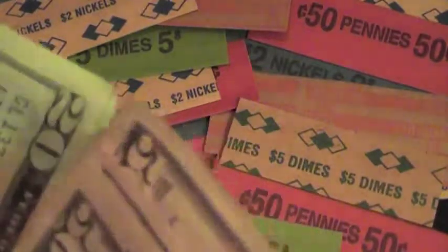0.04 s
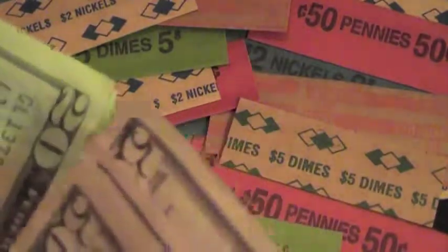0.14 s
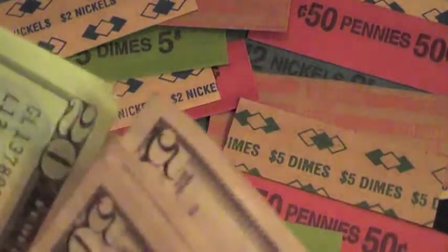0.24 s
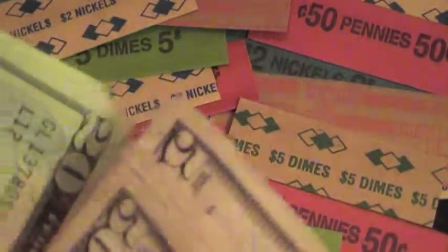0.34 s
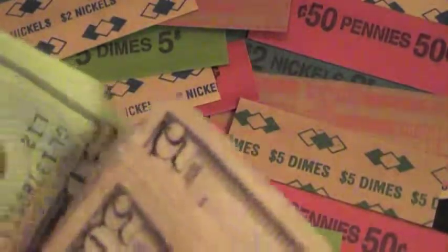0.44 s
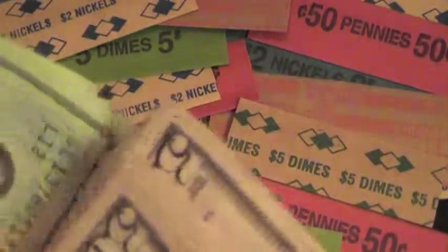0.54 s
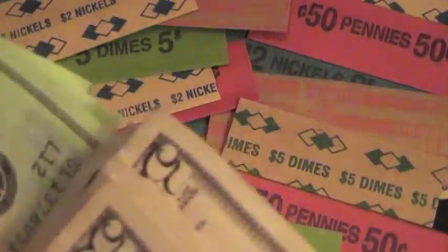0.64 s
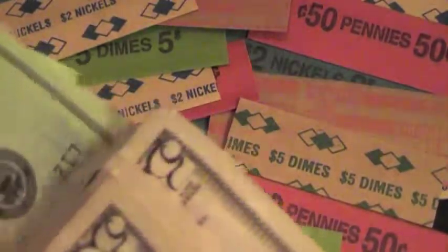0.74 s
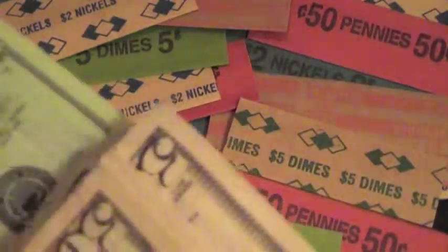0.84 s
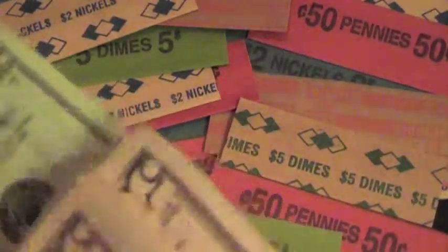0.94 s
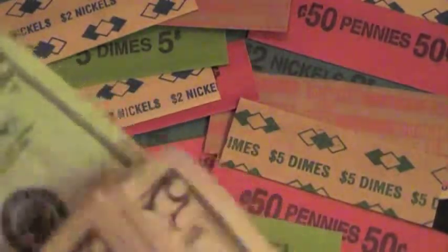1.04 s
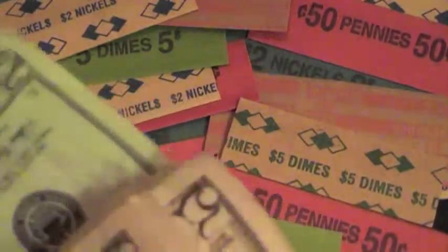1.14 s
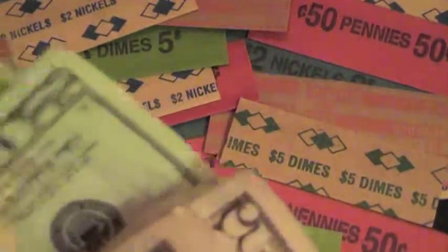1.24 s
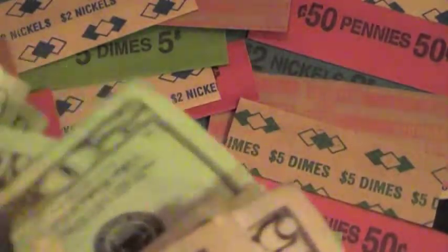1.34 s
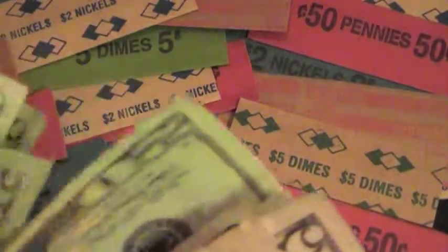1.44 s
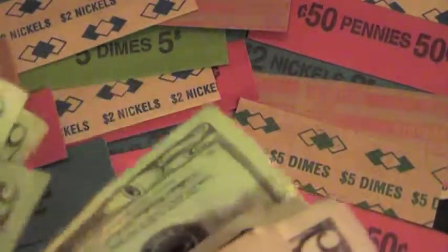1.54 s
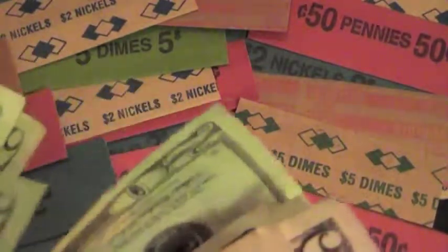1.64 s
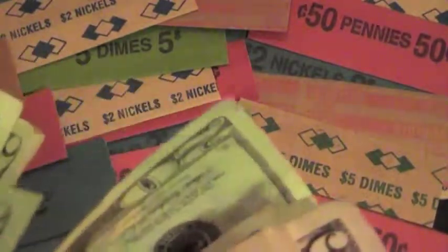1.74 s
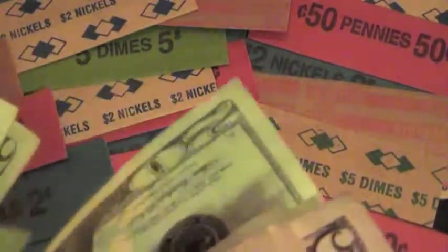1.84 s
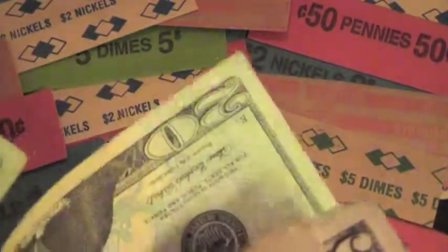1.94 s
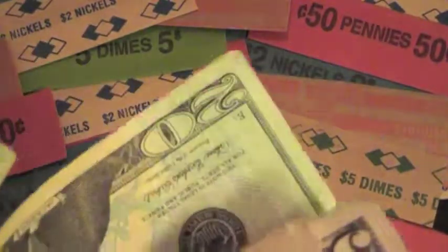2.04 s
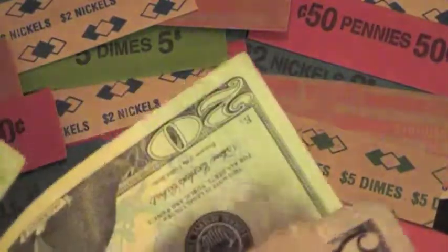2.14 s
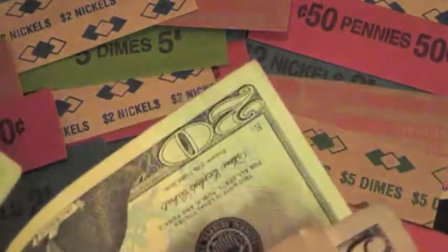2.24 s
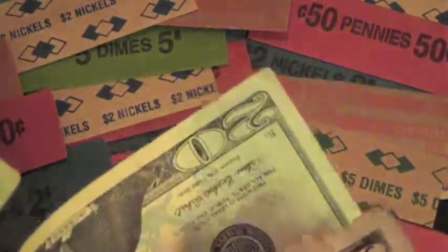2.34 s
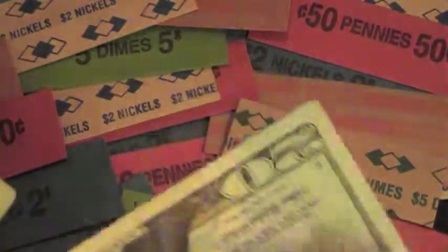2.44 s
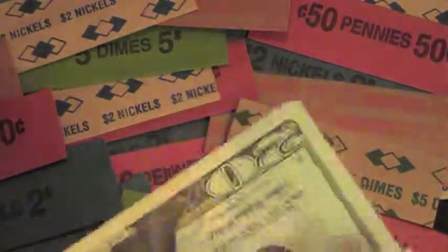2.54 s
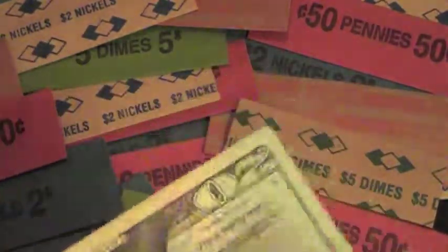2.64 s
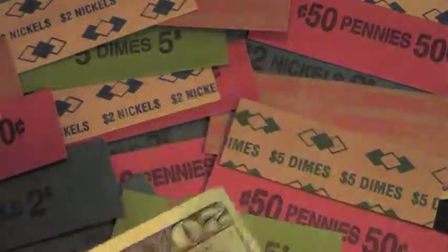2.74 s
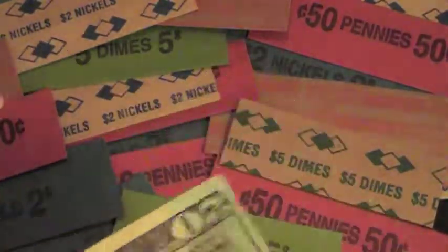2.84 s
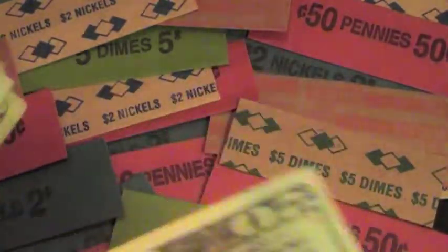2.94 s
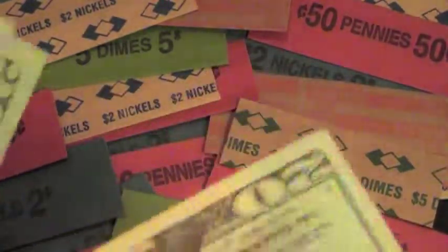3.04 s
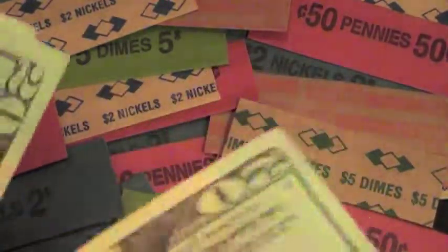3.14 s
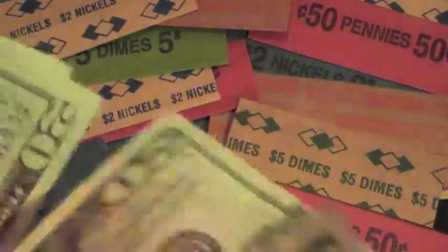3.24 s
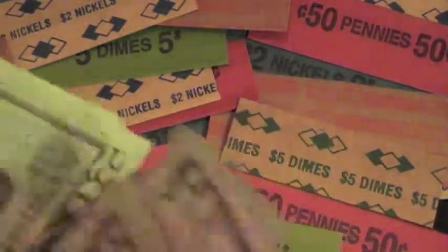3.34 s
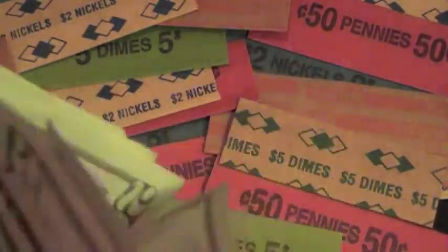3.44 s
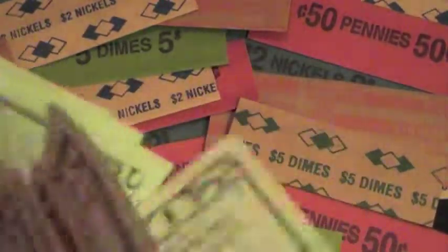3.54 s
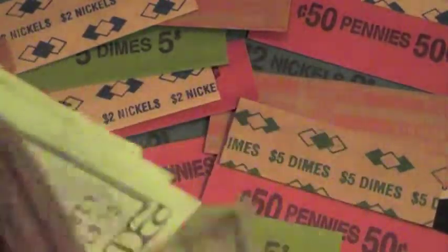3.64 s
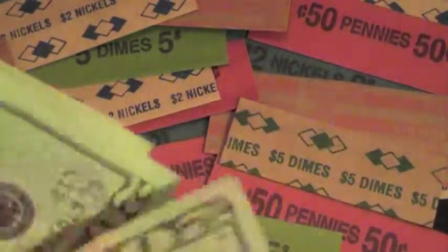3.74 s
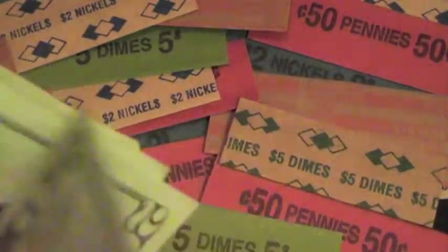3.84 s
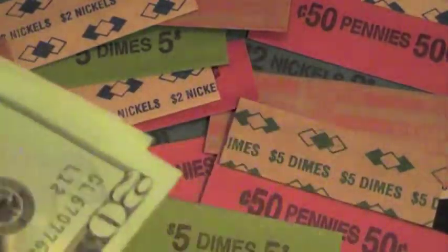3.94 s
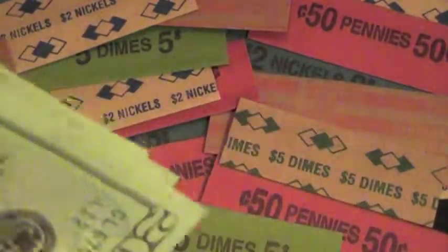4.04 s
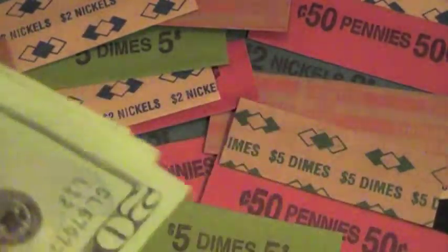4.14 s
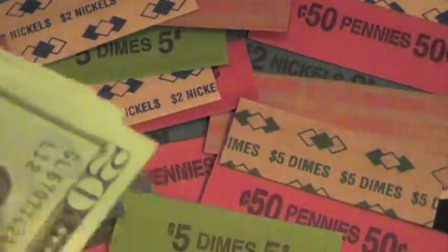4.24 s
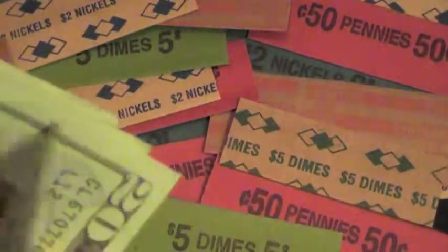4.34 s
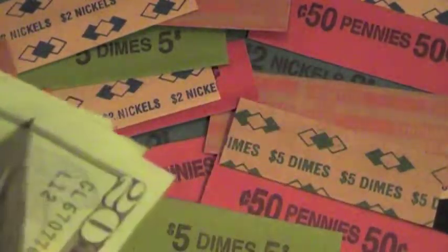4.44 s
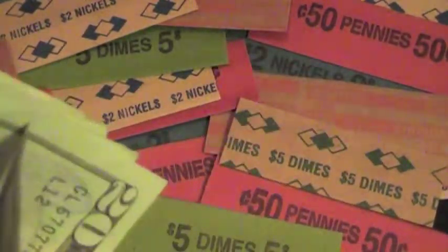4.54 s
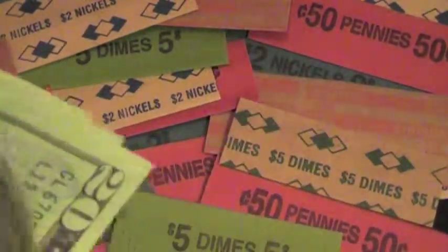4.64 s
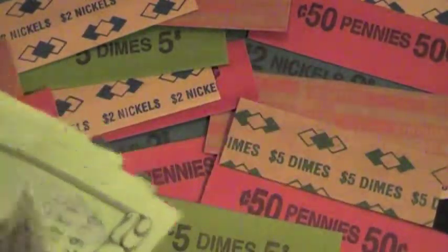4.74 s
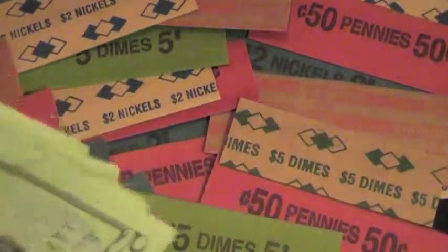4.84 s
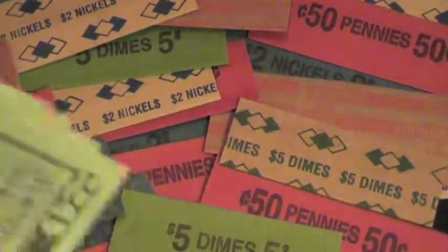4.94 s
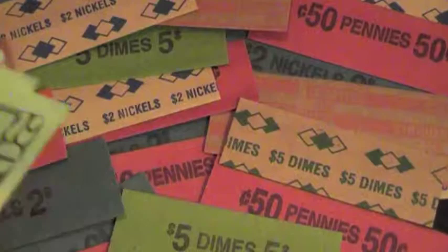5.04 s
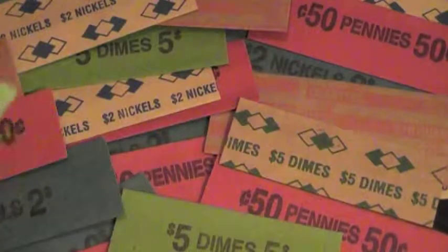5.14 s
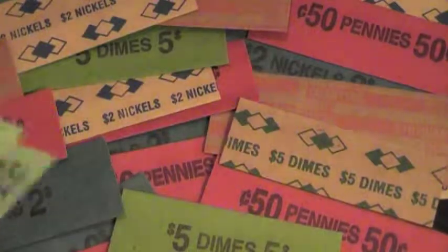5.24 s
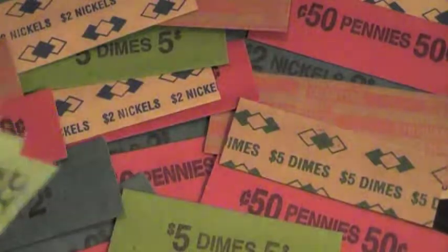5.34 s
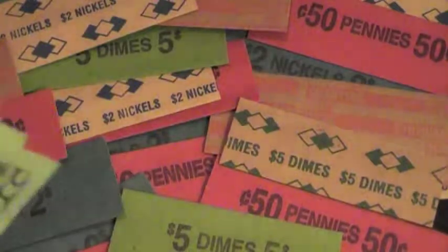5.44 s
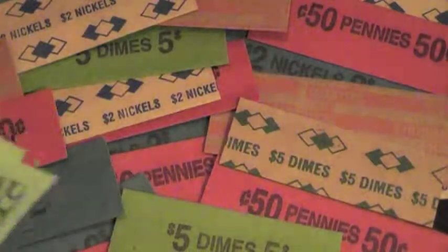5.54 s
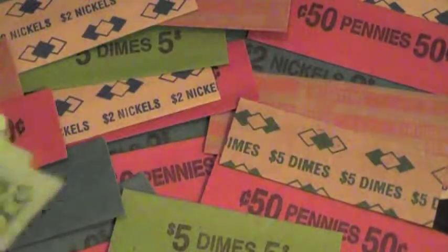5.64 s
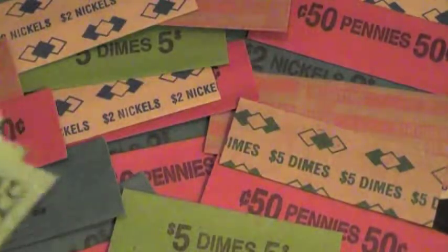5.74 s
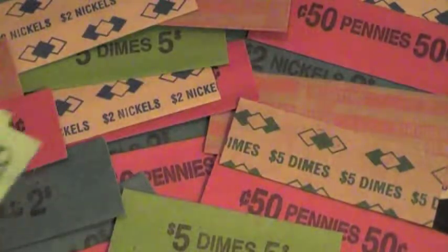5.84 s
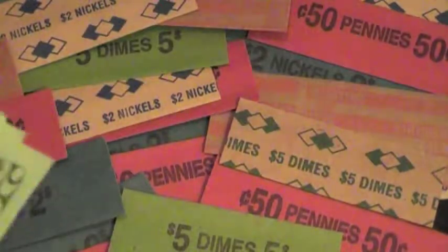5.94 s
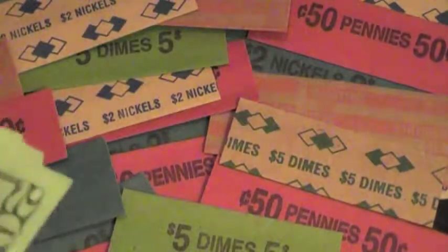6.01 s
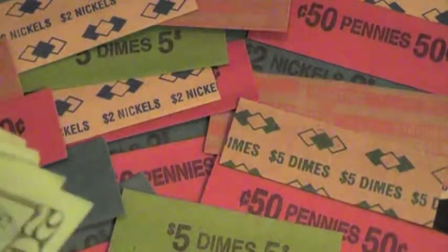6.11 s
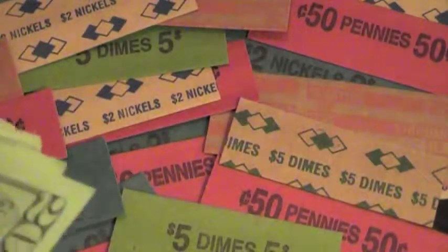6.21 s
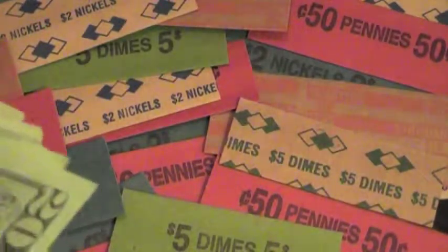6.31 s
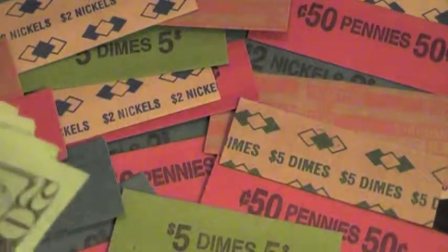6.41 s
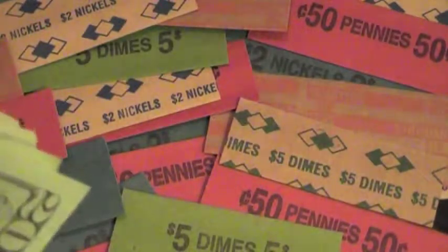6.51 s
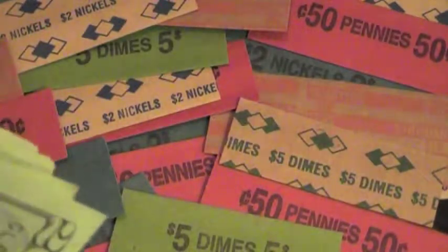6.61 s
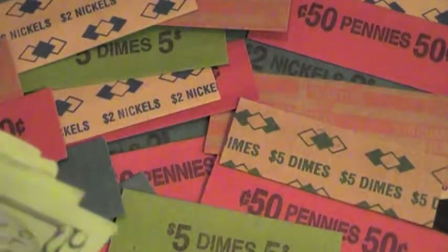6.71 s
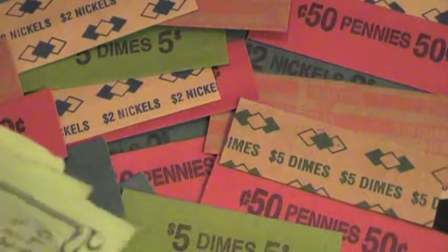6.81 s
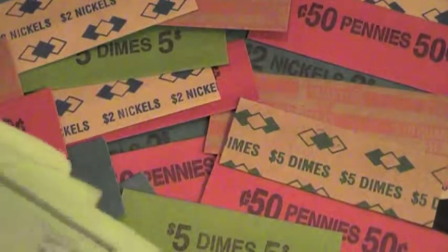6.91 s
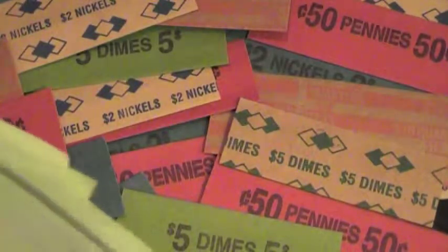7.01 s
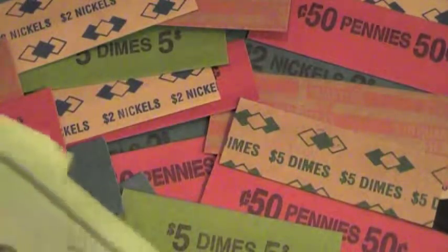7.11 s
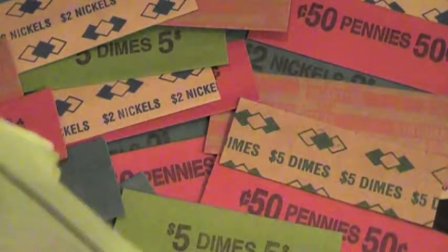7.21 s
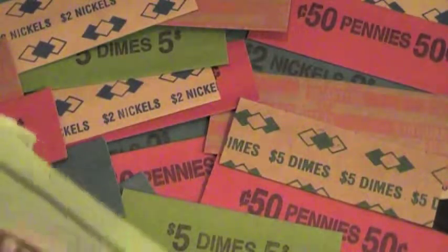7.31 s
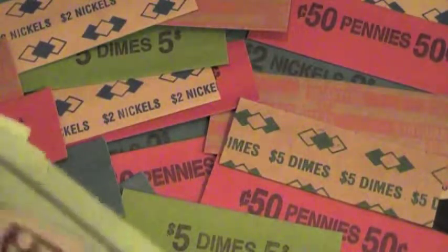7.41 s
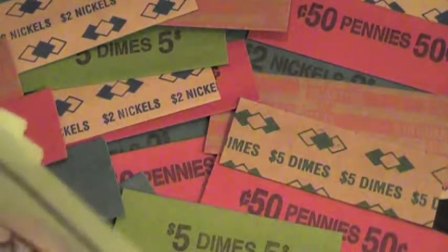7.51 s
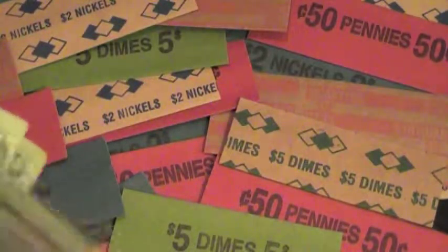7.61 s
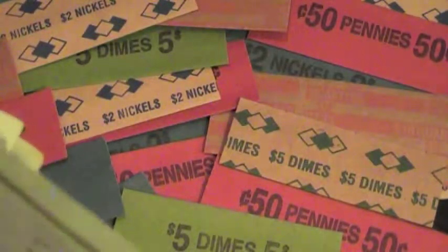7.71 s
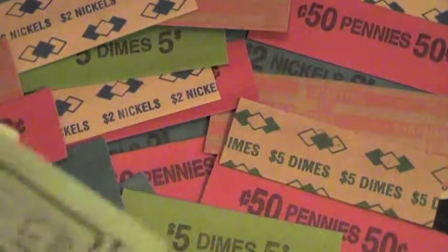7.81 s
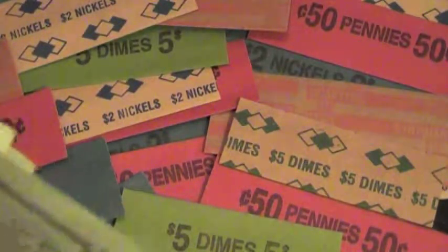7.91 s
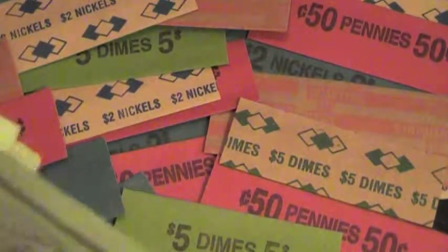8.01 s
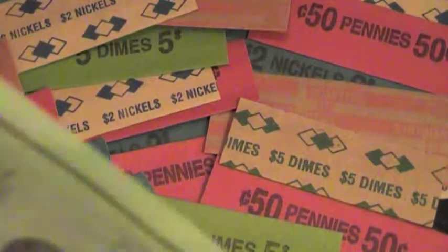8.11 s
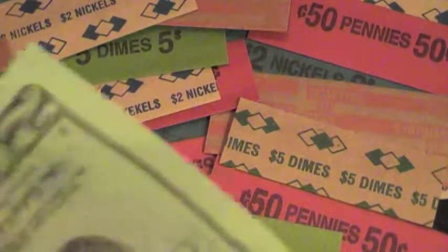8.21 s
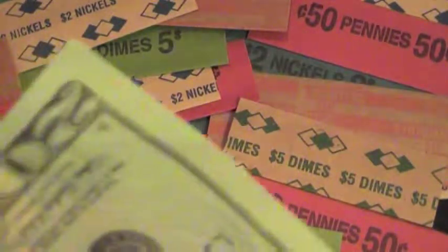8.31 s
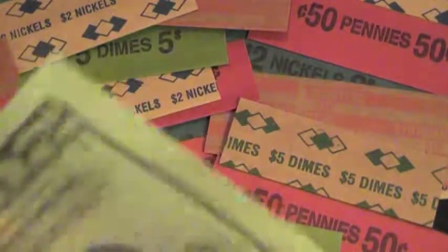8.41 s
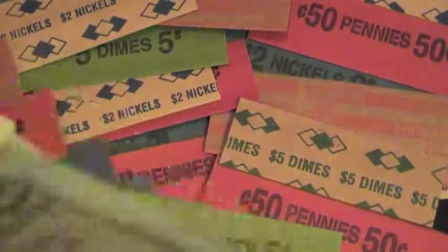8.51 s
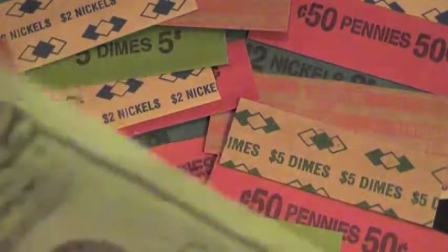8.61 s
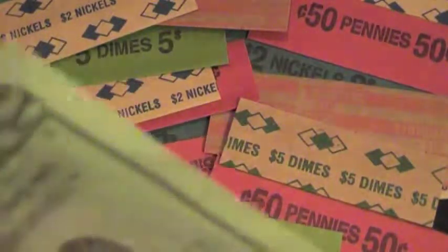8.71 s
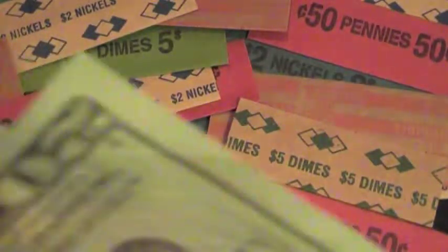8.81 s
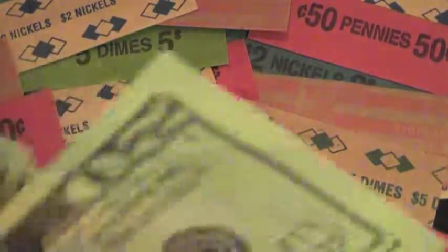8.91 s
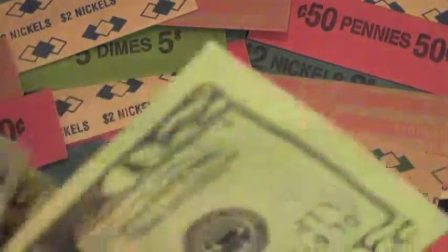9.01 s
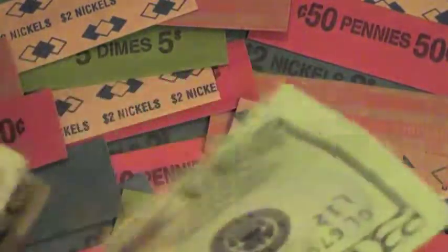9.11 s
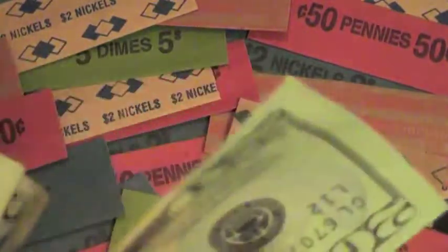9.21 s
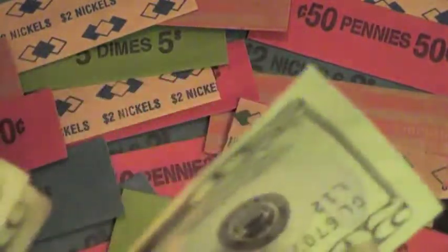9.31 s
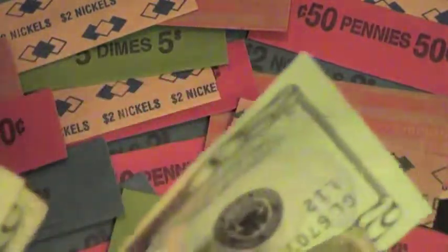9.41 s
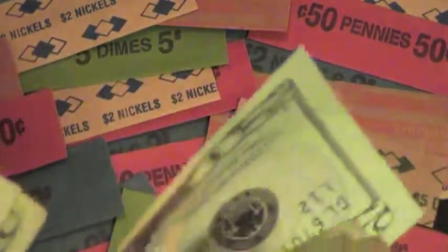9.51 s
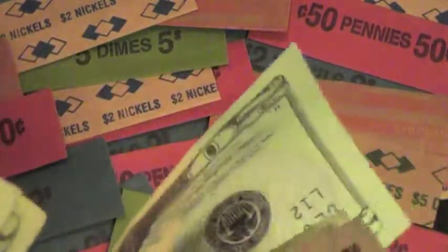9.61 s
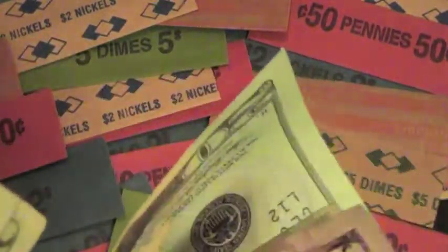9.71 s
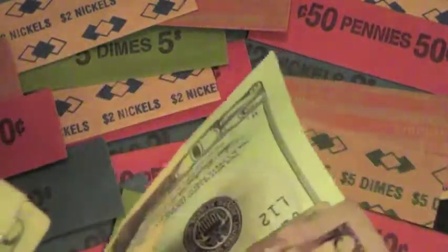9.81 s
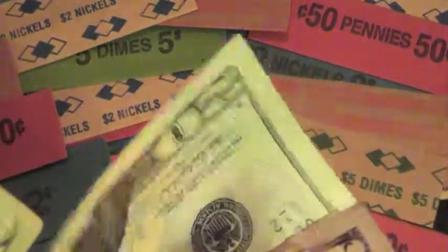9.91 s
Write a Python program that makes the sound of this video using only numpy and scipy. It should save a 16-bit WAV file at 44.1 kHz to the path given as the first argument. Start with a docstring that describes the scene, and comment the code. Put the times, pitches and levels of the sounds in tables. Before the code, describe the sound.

A quiet indoor room with low rumble, wavering hum, a very faint whine and soft microphone hiss. Paper banknotes are handled very close, in stereo. From 0 to 1.3 seconds there are only faint rustles and small ticks. At 1.5 to 1.7 a crinkle builds to a hard snap, then around 2.0 to 2.1 comes the loudest cluster, several bright cracks within a thick swish. Smaller snaps follow at 2.5, with a strong pop at 3.05 and a flutter of little ticks. From 3.3 to 4.9 it is sparse: soft slides and short thumb pushes. At 5.1 a breathy, high paper swish passes, then light shuffling and tiny clicks. A very sharp snap cracks at 7.4, another at 7.6. After 8.3 crinkling thickens, with loud pops near 8.95, 9.2, 9.35 and 9.55, and a last snap at 9.95. Each leaves a short room tail.

```python
"""In a quiet room, hands count paper banknotes close to a small stereo microphone.
Notes slide over each other: showers of tiny random clicks ring the paper as low rustle and high hiss.
Creases tick and snap (short decaying swings, cracks and thuds), and thumbs push single notes off the stack.
The room answers with a short noise tail, over low rumble, wavering hum, a faint whine and microphone hiss."""
import sys
import numpy as np
from scipy import signal
from scipy.fft import rfft, irfft
from scipy.io import wavfile
from scipy.ndimage import uniform_filter1d

SR = 44100
rng = np.random.default_rng(int(sys.argv[2]) if len(sys.argv) > 2 else 0)


def file_out(sig):
    """Save sig as 16-bit WAV at sys.argv[1]."""
    # one column per channel
    cols = np.atleast_2d(sig).T
    # limit, then scale
    lim = np.clip(cols, -1, 1)
    pcm = np.round(lim * 32767).astype(np.int16)
    wavfile.write(sys.argv[1], SR, pcm)


N = 439236
T = np.arange(N) / SR

# One note sliding over another; swell and fade are the times for 20 dB of rustle:
# [loudest_s, swell_s, fade_s, rustle_db, hiss_db, rustle_centre_hz]
SLIDES = [(0.04, 0.033, 0.027, -45.5, -47, 2320), (.108, 0.085, .1, -58.5, -57, 2000),
          (.259, 0.1, 0.08, -62, -68, 1520), (.474, 0.57, 0.46, -60, -60, 2210),
          (.603, 0.083, 0.97, -59.5, -57, 1730), (.937, 0.22, 0.19, -45, -47, 2100),
          (1.104, 0.069, 0.28, -56, -57.5, 1410), (1.175, .15, 0.48, -60, -58.5, 1330),
          (1.33, 0.22, 0.35, -46.5, -43, 1900), (1.47, 0.11, 0.18, -32.5, -36.5, 1700),
          (1.539, 0.14, 0.029, -35, -45.5, 1750), (1.587, 0.031, 0.069, -34, -41.5, 1880),
          (1.788, 0.4, 0.1, -38.5, -48.5, 1560), (1.962, 0.18, 0.1, -30, -39, 1450),
          (2.0, 0.039, 0.085, -21, -24, 1500), (2.05, 0.16, 0.14, -26, -28.5, 2060),
          (2.308, .17, 0.13, -40, -47, 1880), (2.46, 0.12, 0.15, -33.5, -37.5, 1960),
          (2.546, 0.23, 0.039, -42, -46, 1930), (2.652, 0.05, 0.084, -43.5, -48, 1980),
          (2.819, 0.25, 0.18, -50.5, -47, 2220), (2.895, 0.059, 0.11, -40.5, -40.5, 2220),
          (3.031, 0.14, 0.11, -41.5, -42, 1680), (3.075, .05, 0.12, -41.5, -55, 1120),
          (3.179, .2, 0.13, -42.5, -48.5, 1350), (3.33, 0.93, .4, -48, -54, 1940),
          (3.446, 0.072, 0.36, -46.5, -45.5, 2680), (3.5, 0.31, 0.082, -46, -39.5, 2650),
          (3.629, .4, 0.033, -60.5, -60.5, 2560), (3.786, 0.16, 0.081, -46.5, -44.5, 1920),
          (3.993, 0.11, .11, -51.5, -54.5, 2400), (4.186, 0.1, 0.31, -51, -53.5, 2200),
          (4.433, 0.029, 0.33, -54, -51, 1850), (4.835, 0.29, .3, -51, -46, 2200),
          (4.958, 0.059, 0.14, -41.5, -36.5, 2220), (5.089, 0.1, 0.17, -35.5, -26.5, 2700),
          (5.194, 0.21, 0.051, -38.5, -29, 2610), (5.379, 0.1, 0.096, -42.5, -37, 2360),
          (5.533, 0.15, 0.028, -52.5, -52, 2470), (5.596, 0.055, 0.058, -49.5, -48.5, 2270),
          (5.687, 0.079, .06, -54.5, -52.5, 2240), (5.764, 0.059, 0.076, -48.5, -49.5, 2280),
          (5.88, 0.13, 0.27, -51.5, -48.5, 2700), (5.964, 0.24, 0.12, -53.5, -48.5, 2100),
          (6.199, 0.096, 0.038, -44, -42.5, 2070), (6.305, 0.11, .15, -48.5, -43, 2620),
          (6.493, 0.22, .15, -48.5, -47, 2260), (6.66, 0.061, .15, -51, -49, 2330),
          (6.787, 0.071, 0.51, -58, -51, 2520), (6.842, 0.25, 0.15, -54, -58, 2570),
          (6.999, 0.13, 0.16, -47.5, -40.5, 2940), (7.14, 0.07, 0.68, -53.5, -47, 2900),
          (7.429, 0.082, 0.18, -37.5, -34.5, 2900), (7.626, 0.46, 0.21, -45.5, -50, 1690),
          (7.833, 0.82, .2, -53.5, -50, 2000), (7.892, 0.12, 0.11, -44.5, -42, 2290),
          (8.153, 0.038, 0.6, -52, -48, 1910), (8.248, 0.13, 0.23, -39, -42, 2250),
          (8.387, 0.15, 0.048, -38.5, -42.5, 1600), (8.547, 0.044, .1, -42, -46, 2190),
          (8.623, 0.069, 0.19, -40, -40.5, 1780), (8.898, .09, 0.28, -35, -41, 1780),
          (8.94, 0.033, 0.19, -37.5, -44, 2020), (9.069, 0.23, 0.038, -40, -50, 1760),
          (9.177, 0.047, .2, -33, -43, 1740), (9.245, 0.076, 0.097, -31.5, -46.5, 1070),
          (9.435, 0.13, 0.1, -36, -42.5, 1860), (9.602, 0.083, 0.05, -38, -42.5, 1750),
          (9.695, 0.19, 0.15, -45.5, -48, 1650), (9.823, 0.034, 0.042, -39, -46.5, 1600),
          (9.93, .06, .2, -53, -65, 1670)]
# Slow change of colour; hiss centre when hiss equals rustle, flap level at a rustle of -45 dB:
# [time_s, hiss_centre_hz, flap_db]
COLOUR = [(0, 7500, -53), (1.2, 7650, -53.5), (1.6, 8000, -59.5), (2.15, 6500, -55), (2.3, 8100, -44.5),
          (2.7, 7540, -51.5), (2.9, 7650, -52.5), (3.2, 6900, -51), (3.5, 7870, -51), (4.2, 7700, -51.5),
          (5.1, 8300, -55), (6, 7400, -54.5), (6.7, 7000, -52.5), (7.45, 7050, -52.5), (7.8, 7240, -50),
          (8.8, 8700, -54), (9.1, 8360, -54.5), (9.3, 6300, -53), (9.7, 6400, -51), (9.96, 7400, -62)]
# A thumb pushing one note off the stack: [start_s, length_s, rustle_db, hiss_db]
STROKES = [(2.243, 0.05, -38.5, -42), (2.467, 0.027, -30.5, -31.5), (3.718, 0.039, -34, -36.5),
           (3.939, 0.022, -39, -38), (4.129, 0.023, -36.5, -34.5), (4.441, 0.023, -45.5, -45.5),
           (4.646, 0.029, -50, -51.5), (4.84, 0.024, -39.5, -40.5), (5.321, 0.013, -39.5, -39),
           (6.13, 0.03, -40, -38), (8.675, 0.033, -36, -44)]
# Creases snapping through; peak_s is the top of the snap's envelope,
# the last three levels are relative to the peak of the swing:
# [peak_s, swing_peak_db, sheet_pitch_hz, crack_db, thud_db, flutter_db]
SNAPS = [(0.0647, -28.5, 2370, -2.5, -14, -29), (.6014, -30, 1640, -3, -13, -28),
         (0.6615, -28, 2320, -1.5, -13, -36), (.8833, -30.5, 2600, 0, -10, -36),
         (1.0305, -31.5, 2800, -9, -23, -34), (1.095, -25, 1190, -23, -25, -32),
         (1.1015, -25, 2280, -27, -15, -34), (1.1143, -27.5, 1260, -17, -11, -30),
         (1.1677, -22, 1390, -24, -12, -32), (1.5446, -10.5, 1540, -8, -18, -22.5),
         (1.674, -2, 2210, -40, -25, -30.5), (1.937, -23, 2200, -10, -26, -33.5),
         (2.004, -5, 2450, 3, -21, -33), (2.0145, 1.5, 1570, -14, -28, -34),
         (2.043, .5, 2650, 0.5, -26, -33), (2.0776, -3, 1800, -7, -18, -32),
         (2.084, -2.5, 1770, -7, -14, -33), (2.2458, -24, 1880, -17, -13, -32),
         (2.2515, -27.5, 1080, 4.5, 0, -27), (2.485, -12.5, 1790, 0, -7.5, -20),
         (2.627, -35.5, 1510, -14, 1, -26), (2.6852, -24.5, 1690, -10, -6.5, -29),
         (2.7372, -31.5, 2310, -15, -16, -24), (2.894, -25, 1860, -9, -15, -34),
         (2.921, -27, 3200, -7, -21, -34), (3.043, -19.5, 1950, -11, -13, -17),
         (3.052, -4, 1350, -10.5, -36, -37), (3.119, -26.5, 1500, -4, 3.5, -30),
         (3.123, -28, 900, 2, -7, -32), (3.1267, -15, 1860, -10, -11, -28),
         (3.1661, -20.5, 1470, -25, -8, -37), (3.173, -25, 930, -22, -2, -32),
         (3.179, -20, 1580, -25, -8, -41), (3.1878, -16.5, 1460, -28, -25, -27),
         (3.205, -28, 864, -12, -25, -30), (3.2064, -27.5, 720, -9, 7.5, -17),
         (3.233, -29, 850, -7, -6, -32), (3.363, -27, 2280, -5, -24, -34), (3.379, -32, 1320, -19, 1, -29),
         (3.3834, -27, 1690, -9, -7.5, -36), (3.9533, -33, 2940, 6, -11, -27),
         (4.4398, -26.5, 1930, -23, -18, -32), (4.447, -28.5, 1420, -8, -6, -32),
         (4.664, -29.5, 1740, -9, -20, -31), (5.7307, -22.5, 2050, -6, -21, -26),
         (6.1464, -27.5, 2420, 4.5, -16, -34), (6.4637, -35.5, 1760, 8, -16, -32),
         (6.6386, -29.5, 2680, -8, -10, -32), (6.6422, -27.5, 2180, -2, -20, -37),
         (6.6805, -36, 940, 4, 1, -32), (6.7582, -27.5, 1860, -8, -18, -24),
         (6.8166, -29.5, 2220, -11, -29, -53), (6.8592, -27, 2600, 4.5, -34, -35),
         (6.876, -35, 1760, 5.5, -30, -32), (6.9607, -28, 3120, -5, -15, -32),
         (7.2716, -33, 2250, -1, -12, -29), (7.3075, -31.5, 2380, -15, -13, -37),
         (7.3827, -25, 2340, -3, -27, -34), (7.4055, 3.5, 2780, -11.5, -26.5, -40),
         (7.439, -19.5, 2600, 6, -8, -41), (7.5765, -9.5, 1550, 3, -17.5, -29),
         (7.71, -27, 1070, -16, -26, -43), (7.718, -15.5, 1800, 1.5, -33, -25.5),
         (7.884, -18.5, 1860, -4, -31, -43), (7.8988, -19.5, 3200, -1.5, -19, -36),
         (8.004, -42, 690, -23, 6.5, -36), (8.1475, -27, 1510, -22, -10, -37),
         (8.3068, -13, 1330, -13, -25, -39), (8.3142, -16, 1850, -8.5, -15, -32),
         (8.3778, -17, 1860, -25, -33, -42), (8.5224, -29.5, 2300, -7, -34, -33),
         (8.6884, -18, 1750, 6.5, -19, -35), (8.693, -16.5, 1680, -22, -7, -34),
         (8.762, -26, 1080, -18, -14, -40), (8.8344, -18, 1410, -6, -11.5, -18),
         (8.9441, -3.5, 2120, 2.5, -18, -34), (8.9628, -7, 2450, -16, -38, -21.5),
         (9.026, -23.5, 1100, -20, -9, -27), (9.1415, -28, 1320, -3.5, -14, -32),
         (9.1907, -20, 2210, -25, -21, -10), (9.2222, -1.5, 1480, -10, -12, -45),
         (9.3529, -8.5, 2360, -5, -41, -24.5), (9.4282, -13, 2120, -11, -22, -42),
         (9.484, -30, 1720, -3, -13, -34), (9.54, -34, 1500, 0, -15, -4),
         (9.551, -6, 1510, -3.5, -17.5, -21), (9.6238, -17.5, 1670, -26, -13, -23),
         (9.6273, -15, 1720, -34, -26, -31), (9.6555, -19, 1430, -24, -29, -20),
         (9.695, -23.5, 1620, -6, -20, -14.5), (9.9458, -4.5, 1860, -17.5, -28.5, -26)]
# Resonances of the paper: low rustle, high fibre hiss, airy top of the hiss, flapping of the whole note.
# Widths are for one filter pass, levels are relative within a table: [centre_hz, width_hz, level_db]
RUSTLE_MODES = [(833, 950, 6), (1330, 850, 3.5), (1720, 920, 0), (2470, 970, 1.5), (3530, 1820, -0.5)]
FIBRE_MODES = [(4480, 2900, -6.5), (5410, 1320, 6), (6900, 5600, -5), (9820, 3840, 2)]
AIR_MODES = [(13500, 12400, 0)]
FLAP_MODES = [(647, 1220, 6), (188, 260, -12.5)]
# Time the room tail takes to fall 60 dB: [pitch_hz, fall_s]
ROOM_FALL = [(500, 0.47), (2000, 0.28), (8000, 0.2)]
# Spectrum shape of the background noise, overall level set apart: [pitch_hz, relative_level_db]
QUIET_SHAPE = [(18, -50), (30, -7), (71, -17), (109, 3), (179, 9.5), (702, -12), (844, -20), (1280, -42.5),
               (2350, -27.5), (3870, -18), (8740, -26), (12600, -44), (16000, -45)]
# How much of the background differs left to right: [pitch_hz, side_minus_mid_db]
QUIET_SIDE = [(60, 7), (110, -11), (200, -12), (380, -2), (700, 6.5), (1290, 31), (2380, 10), (4400, 0.5),
              (8120, 3), (15000, 20.5)]
# Steady tones, level before it wavers: [pitch_hz, rms_db]
HUM = [(48.4, -72), (70.0, -70), (118.4, -62.5)]
WHINE = [(839.8, -72)]

REST_RUSTLE_DB, REST_HISS_DB, REST_HZ = -75, -69, 1700  # notes held still; rustle centre
HISS_QUICKER = 1.27  # hiss swells and fades this much faster than rustle
HISS_HZ_PER_DB = 45  # the hiss centre rises for each dB that hiss gains on rustle
FLAP_SLOPE = 0.57  # dB of flap per dB of rustle
RUSTLE_FOCUS_DB, HISS_FOCUS_DB = 10.5, 12.0  # loss of modes one octave off the centre
TICKS_PER_S, TICK_DB = 250, -11  # average rate; level against the rustle
SWING_RISE_CYCLES = 0.75 * 1.13  # rise of a snap, in cycles of the sheet pitch
CRACK_HZ, CRACK_HZ_PER_DB = 6700, 43  # centre when crack equals swing; a stronger crack is brighter
BASS_CUT_HZ, TOP_HZ = 177, 15900
PORTS_DB, PORTS_HZ = -8.5, 5370  # left-right drift of the treble, and where the treble starts
ROOM_DB, QUIET_DB = -12.5, -58


def sliding(rustle_db, hiss_db, rustle_hz):
    """Coarse catches ring the sheet low, fine ones hiss high; the whole note flaps below."""
    time_s, slow_hz, slow_db = np.transpose(COLOUR)
    hiss_hz = np.interp(T, time_s, slow_hz) + HISS_HZ_PER_DB * (hiss_db - rustle_db)
    flap_db = np.interp(T, time_s, slow_db) + FLAP_SLOPE * (rustle_db + 45)
    stroke_rustle, stroke_hiss = strokes()

    coarse = catches(spread_db=1.34, patchy_db=2.0)
    fine = coarse * np.sign(rng.standard_normal(N))  # same patches, unrelated phase
    rustle = sheet(coarse, RUSTLE_MODES, rustle_hz, RUSTLE_FOCUS_DB, shift_db=3.5)
    rustle = rustle + undb(TICK_DB) * ticks()
    hiss = sheet(fine, FIBRE_MODES, hiss_hz, HISS_FOCUS_DB, shift_db=2.0)
    hiss = hiss + undb(-21.5) * ring(fine, AIR_MODES)
    flap = ring(catches(spread_db=1.0, patchy_db=3.0), FLAP_MODES)

    # slides and thumb strokes add as powers
    rustle_gain = np.hypot(undb(rustle_db), stroke_rustle)
    hiss_gain = np.hypot(undb(hiss_db), stroke_hiss)
    return rustle_gain * rustle + hiss_gain * hiss + undb(flap_db) * flap


def motion():
    """All slides added as powers: rustle dB, hiss dB and rustle centre Hz, led by the loudest slide."""
    t = np.arange(0, N / SR, .001)  # worked out every millisecond
    loudest_s, swell_s, fade_s, rustle_db, hiss_db, centre_hz = np.array(SLIDES).T[:, :, None]
    loss_db = 20 * np.where(t < loudest_s, (loudest_s - t) / swell_s, (t - loudest_s) / fade_s)
    rustle = undb(rustle_db - loss_db) ** 2
    hiss = undb(hiss_db - HISS_QUICKER * loss_db) ** 2
    rest_rustle, rest_hiss = undb(REST_RUSTLE_DB) ** 2, undb(REST_HISS_DB) ** 2
    all_rustle = rustle.sum(axis=0) + rest_rustle
    all_hiss = hiss.sum(axis=0) + rest_hiss
    mean_hz = ((rustle * centre_hz).sum(axis=0) + rest_rustle * REST_HZ) / all_rustle
    curves = 10 * np.log10(all_rustle), 10 * np.log10(all_hiss), mean_hz
    return [np.interp(T, t, curve) for curve in curves]


def strokes(fall_s=0.009):
    """Gain of rustle and hiss while a thumb pushes: quick swell, hold, quick stop."""
    rustle, hiss = np.zeros(N), np.zeros(N)
    for start_s, length_s, rustle_db, hiss_db in STROKES:
        progress = np.maximum((T - start_s) / length_s, 0)
        rise = np.sin(np.pi / 2 * np.minimum(2 * progress, 1))  # full after half the length
        shape = rise * np.exp(-np.maximum(T - start_s - length_s, 0) / fall_s)
        rustle += undb(rustle_db) * shape
        hiss += undb(hiss_db) * shape
    return rustle, hiss


def catches(spread_db, patchy_db):
    """Fibres catching and letting go: a tiny click each sample, some larger, in uneven patches."""
    size_db = spread_db * np.minimum(rng.exponential(size=N), 5)
    size_db = size_db + patchy_db * (walk(300) + walk(60))
    return rng.standard_normal(N) * undb(size_db)


def sheet(x, modes, centre_hz, octave_db, shift_db):
    """A bent note: modes near the centre ring most, each wandering in level as the bend changes; rms 1."""
    total, power = 0, 0
    for k, (hz, width_hz, level_db) in enumerate(modes):
        off_centre_db = octave_db * np.log2(hz / centre_hz) ** 2
        gain = undb(level_db - off_centre_db + shift_db * walk(45))
        total = total + (-1) ** k * gain * band(band(x, hz, width_hz), hz, width_hz)
        power = power + uniform_filter1d(gain ** 2, 4096) * width_hz
    return unit(total / np.sqrt(power))  # evens out the slow level changes


def ticks():
    """Tiny creases give way: sparse sharp ticks of uneven size, each ringing the sheet briefly; rms 1."""
    hit = rng.random(N) < TICKS_PER_S / SR
    size = undb(3.0 * np.minimum(rng.exponential(size=N), 2))
    return ring(hit * rng.standard_normal(N) * size, [(2000, 2600, -2.5), (4100, 2500, -10.5)])


def snaps(rustle_hz, crack_s=0.00046, thud_hz=603.0, shiver_db=-17, shiver_s=0.0028,
          flutter_s=0.023, desk_db=-11):
    """A crease flips: the sheet swings a few times, fibres crack, the note thuds, shivers and flutters out."""
    lead, size = 128, 8192  # samples before the peak, and in all
    out = np.zeros(N + 2 * size)
    t = (np.arange(size) - lead) / SR
    for peak_s, swing_peak_db, hz, crack_db, thud_db, flutter_db in SNAPS:
        crack_noise, shiver_noise, flutter_noise = rng.standard_normal((3, size))

        swing = 0
        for ratio, level_db in [(1.176, -2.5), (1.84, -11), (0.85, -2), (2.38, -13.5)]:
            swing = swing + undb(level_db) * np.sin(2 * np.pi * (ratio * hz * t + rng.random()))
        envelope = swell(t, SWING_RISE_CYCLES / hz)
        swing = swing * envelope
        swing = swing - swing.sum() * envelope / envelope.sum()  # no net push
        swing = swing / np.abs(swing).max()

        crack_hz = CRACK_HZ + CRACK_HZ_PER_DB * crack_db
        fibres = [(crack_hz, 0.99 * crack_hz, 0), (12000, 4000, -32)]
        crack = ring(crack_noise, fibres) * swell(t, crack_s)
        crack = undb(crack_db) * crack / np.abs(crack).max()

        thud = undb(thud_db) * swell(t - .001, 0.0011) * np.sin(2 * np.pi * thud_hz * t)
        thud = thud + undb(thud_db - 15) * swell(t - .003, 0.004) * np.sin(2 * np.pi * 190 * t)

        shiver_shape = np.exp(-np.abs(t) / np.where(t > 0, shiver_s, .0005))
        shiver = undb(shiver_db) * unit(band(shiver_noise, hz, 0.28 * hz)) * shiver_shape

        flutter_hz = rustle_hz[min(int((peak_s + flutter_s) * SR), N - 1)]
        flutter = ring(flutter_noise, [(flutter_hz, flutter_hz, 0)])
        flutter = unit(flutter + undb(crack_db - 2.5) * ring(flutter_noise, fibres))
        flutter = flutter * np.exp(-t / flutter_s) * (t > 0)

        blow = swing + crack + thud + shiver
        # the desk below returns each snap a moment later, which combs its colour
        desk_delay_s = .0004 + 0.0013 * rng.random()
        blow = blow + undb(desk_db) * np.roll(blow, int(SR * desk_delay_s))
        i = int(peak_s * SR)
        out[i:i + size] += undb(swing_peak_db) * (blow + undb(flutter_db) * flutter)
    return out[lead:N + lead]  # dropping the lead puts each peak at its time


def ports(x):
    """Sound reaches the left port a touch earlier; the treble drifts between left and right as notes move."""
    high_pass = signal.butter(2, PORTS_HZ, "high", fs=SR, output="sos")
    treble = signal.sosfilt(high_pass, x)
    drift = undb(PORTS_DB) * np.tanh(walk(150))  # random
    # adding a little slope acts like a tiny shift in time
    side = 0.017 * np.gradient(x) + drift * (treble + 2.06 * np.gradient(treble))
    return np.array([x + side, x - side])


def room(x, first_s=0.0029):
    """Diffuse tail, duller as it fades; its low part is mostly alike at two ports so close together."""
    t = np.arange(int(.45 * SR)) / SR
    tail = 0
    for hz in 125 * 2. ** np.arange(8):  # one noise band per octave
        mid, side = (band(rng.standard_normal(len(t)), hz, 0.28 * hz) for _ in range(2))
        wide = np.clip((hz / 6000) ** 4.5, .05, 1)
        stereo = mid + wide * side * np.array([[1], [-1]])
        tail = tail + stereo * undb(-60 * t / on_log(ROOM_FALL, hz))
    tail = tail * np.clip(t / first_s - 1, 0, 1)  # silent up to first_s, full at twice that
    tail = tail / np.sqrt(np.mean(np.sum(tail ** 2, axis=1)))
    return undb(ROOM_DB) * signal.fftconvolve(x[None], tail, axes=1)[:, :N]


def quiet():
    """Low room rumble and microphone hiss from shaped noise, with a wavering hum and a faint whine."""
    hz = np.fft.rfftfreq(N, 1 / SR)
    shape_db = on_log(QUIET_SHAPE, hz)
    mid = irfft(rfft(rng.standard_normal(N)) * undb(shape_db), N)
    side = irfft(rfft(rng.standard_normal(N)) * undb(shape_db + on_log(QUIET_SIDE, hz)), N)
    noise = undb(QUIET_DB) * np.array([mid + side, mid - side]) / np.std(mid)
    tones = 0
    for pitch_hz, rms_db in HUM + WHINE:
        wave = np.sqrt(2) * np.sin(2 * np.pi * pitch_hz * T + 1.6 * walk(9.5))
        tones = tones + undb(rms_db + 1.3 * walk(12)) * wave
    return noise + tones


def undb(db):
    """Turns decibels into a plain gain."""
    return 10 ** (np.asarray(db) / 20)


def unit(x):
    """Scales a sound to rms 1."""
    return x / np.sqrt(np.mean(x ** 2))


def band(x, hz, width_hz):
    """One resonance, gain 1 at its centre."""
    return signal.lfilter(*signal.iirpeak(min(hz, .45 * SR), hz / width_hz, SR), x)


def ring(x, modes):
    """Steep resonances (filtered twice) side by side with alternating sign, rms 1."""
    total = 0
    for k, (hz, width_hz, level_db) in enumerate(modes):
        total = total + (-1) ** k * undb(level_db) * band(band(x, hz, width_hz), hz, width_hz)
    return unit(total)


def on_log(table, hz):
    """Reads a table between its points, along a logarithmic pitch scale."""
    table_hz, values = np.transpose(table)
    return np.interp(np.log(hz + 1), np.log(table_hz), values)


def walk(rate):
    """Random levels held 1 / rate seconds and smoothed twice; spread near 1."""
    hold = int(SR / rate)
    steps = np.repeat(rng.standard_normal(N // hold + 1), hold)
    return 0.89 * uniform_filter1d(uniform_filter1d(steps, hold), hold)[:N]


def swell(t, rise_s):
    """Envelope that rises fast to 1 at t = 0 and dies away."""
    u = np.maximum(1 + t / rise_s, 0)
    return (u * np.exp(1 - u)) ** 2


def scene():
    """Paper sounds at the two ports, with the room's answer and the background."""
    rustle_db, hiss_db, rustle_hz = motion()
    paper = sliding(rustle_db, hiss_db, rustle_hz) + snaps(rustle_hz)
    # a small sheet radiates no deep bass
    bass_cut = signal.butter(3, BASS_CUT_HZ, "high", fs=SR, output="sos")
    paper = signal.sosfilt(bass_cut, paper)
    return ports(paper) + room(paper) + quiet()


def record(dry):
    """Full scale clips the loudest peaks, then a steep filter cuts the top."""
    top_cut = signal.ellip(10, .2, 70, TOP_HZ, fs=SR, output="sos")
    return signal.sosfilt(top_cut, np.clip(dry, -1, 1))


dry = scene()
out = record(dry)
file_out(out)
```